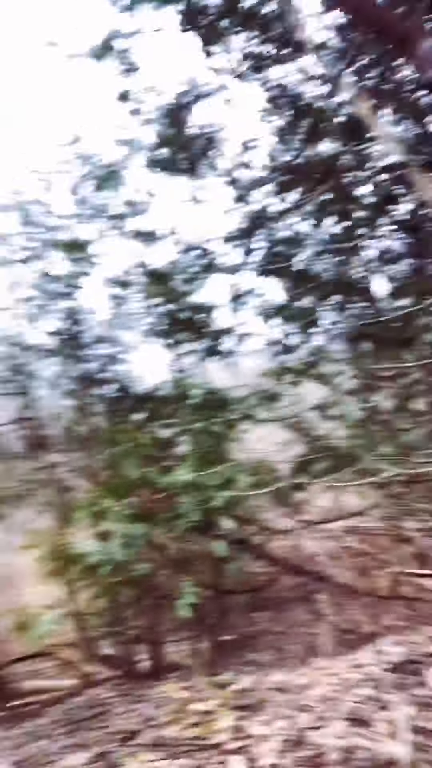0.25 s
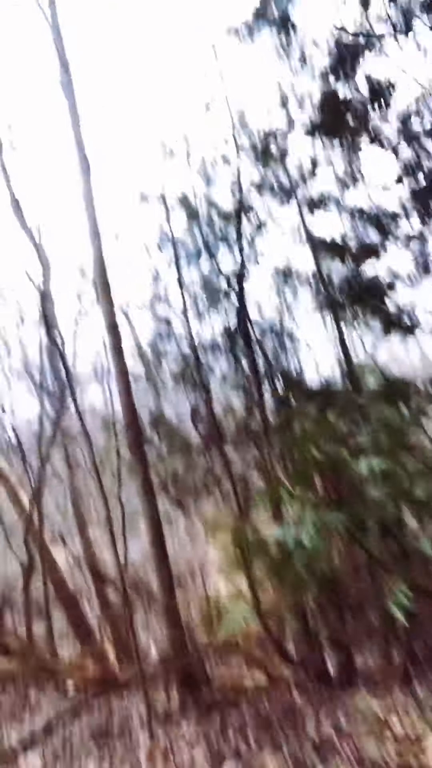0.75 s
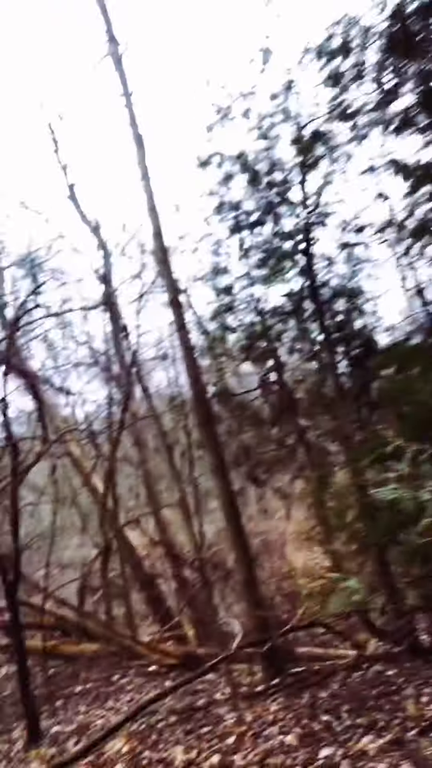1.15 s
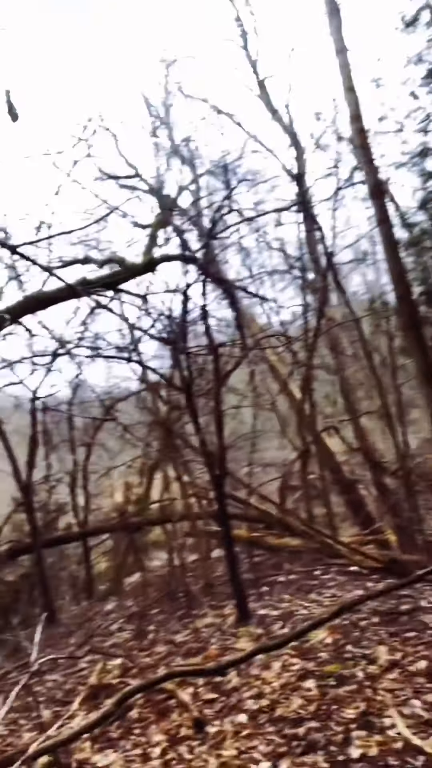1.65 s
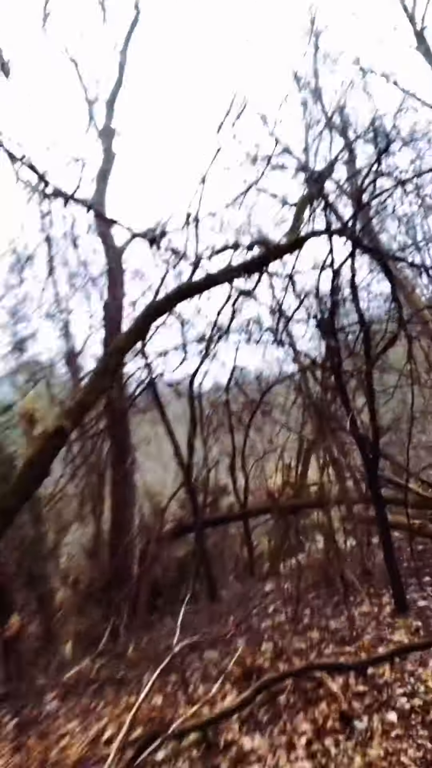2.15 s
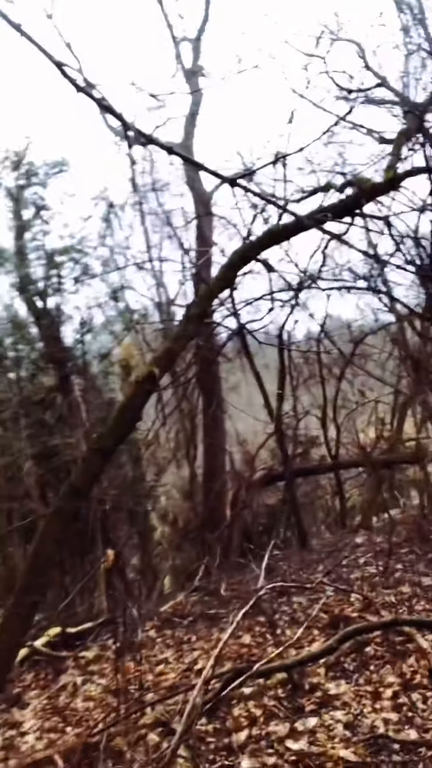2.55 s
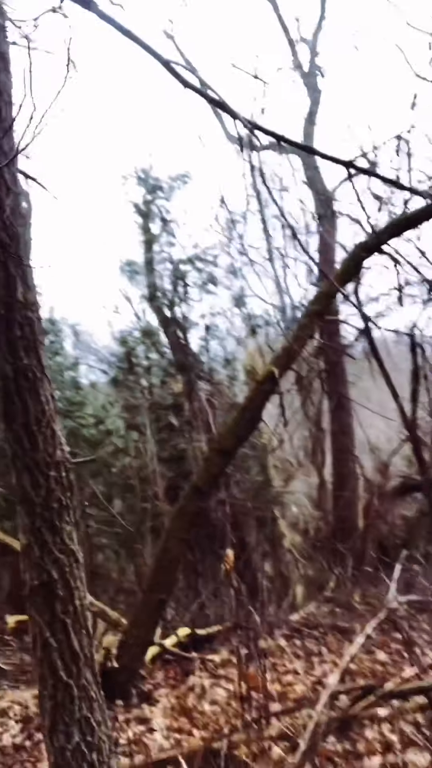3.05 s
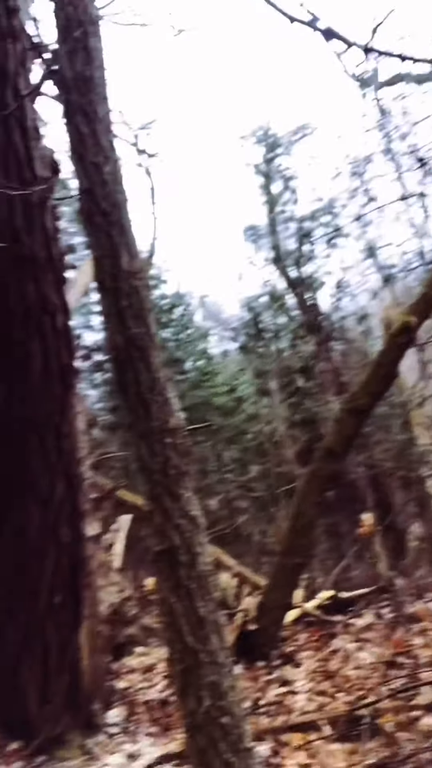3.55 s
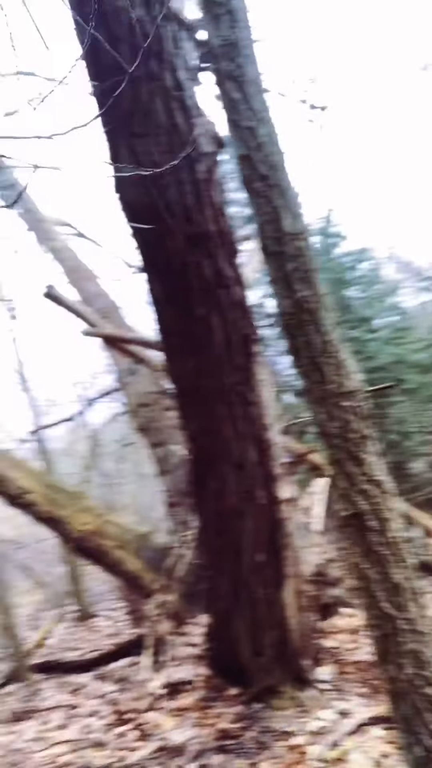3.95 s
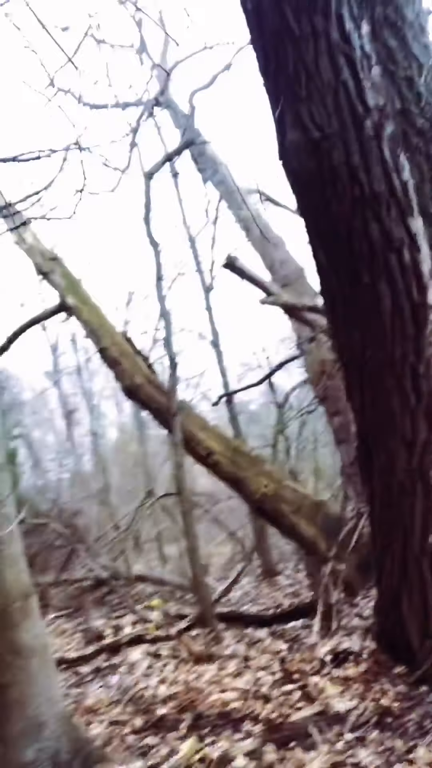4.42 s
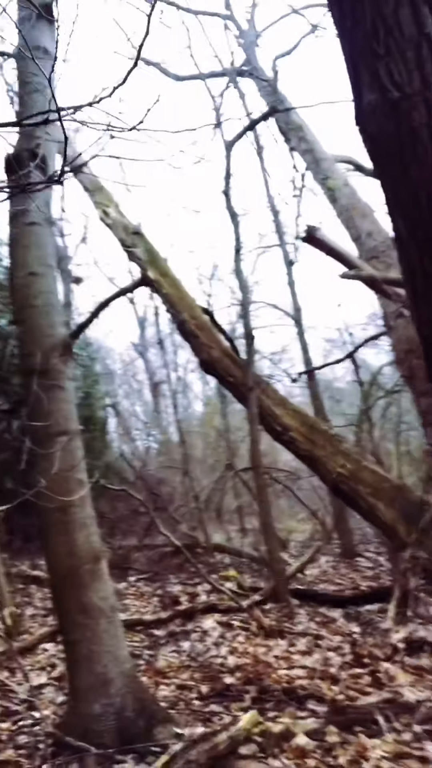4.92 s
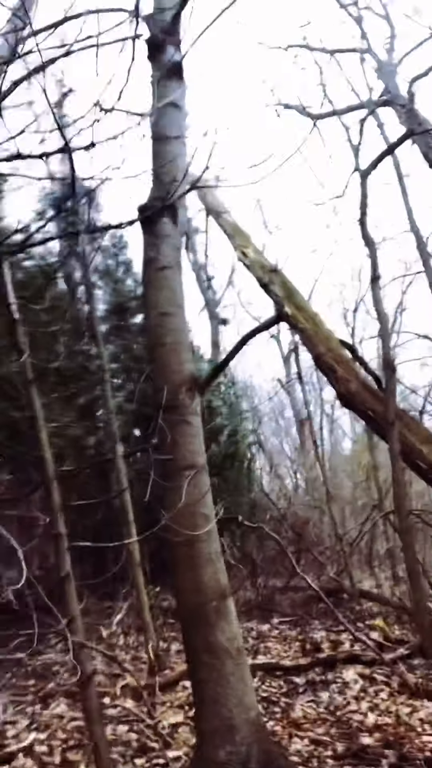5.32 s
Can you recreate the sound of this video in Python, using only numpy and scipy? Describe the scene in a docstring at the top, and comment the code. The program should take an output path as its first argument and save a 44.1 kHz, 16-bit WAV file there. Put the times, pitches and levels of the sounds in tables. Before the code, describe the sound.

A person walks slowly through dry leaf litter in a bare wood, heard close. A small snap at 0.03 s leads into a very loud, sharp double crack at about 0.14-0.16 s, hard enough to clip, with a falling woody chirp, low knock and short diffuse echo from the trunks. Leaves brush and settle in papery crackles, with a dull knock near 0.57 s. At 1.6-1.9 s come medium twig snaps, rustling and a short damp crunch. It quiets from 2 s, when faint distant songbirds whistle in short gliding phrases; soft low knocks cluster at 2.5 s. Light snaps and rustles occur around 3 s. At 3.87 s another loud, bright, splintering crack echoes, with a weaker one right after. Hoarse far calls sound from about 3.6 s onward. Small crisp twig breaks and leaf rustle come at 5.05-5.35 s. A faint, low distant roar runs throughout, slowly sinking.

```python
"""A dead stick cracks at once, sharp and close: someone walks slowly through dry leaves in a bare wood.
Each break is a snap and tearing fibres, spread along the stick into a quick falling chirp, with
bounces off the ground and a noisy tail from the trunks. Low thuds are damped tones, leaves crackle as
clumps of tiny clicks, far birds sing in gliding sine tones, and shaped noise makes a distant roar."""
import sys
import numpy as np
from scipy import signal
from scipy.fft import rfft, irfft, next_fast_len
from scipy.io import wavfile
from scipy.ndimage import uniform_filter1d

SR = 44100
rng = np.random.default_rng(int(sys.argv[2]) if len(sys.argv) > 2 else 0)


def dump_mix(stems):
    """Bounce the given channels to the path in sys.argv[1] as a 16-bit WAV at rate SR."""
    frames = np.atleast_2d(stems).T  # one column per channel
    limited = np.clip(frames, -1, 1)  # hard clip at full scale
    pcm = np.round(limited * 32767).astype(np.int16)
    wavfile.write(sys.argv[1], SR, pcm)


N = 245901   # length in samples
TIME = np.arange(N) / SR   # seconds


def from_db(db):
    """Turn decibels into a gain."""
    return 10 ** (np.asarray(db) / 20)


def unit_energy(x):
    """Scale so that the squares sum to one."""
    return x / np.sqrt(np.sum(x ** 2) + 1e-20)


def rms_one(x):
    """Scale to an average strength (rms) of one."""
    return unit_energy(x) * np.sqrt(len(x))


def add(out, start_s, sound):
    """Mix a sound in at a time in seconds."""
    start = max(round(start_s * SR), 0)
    out[start:start + len(sound)] += sound[:N - start]


def colour(x, spectrum):
    """Filter through points of (Hz, dB), as promptly as those gains allow (minimum phase)."""
    size = 2 * next_fast_len(len(x))
    point_hz, point_db = np.transpose(spectrum)
    hz = np.fft.rfftfreq(size, 1 / SR)
    gain_db = np.interp(np.log(hz + 1), np.log(point_hz), point_db)
    # folding the cepstrum forward in time keeps the filter from ringing before its input
    cepstrum = irfft(np.log(from_db(gain_db)))[:size // 2]
    cepstrum[1:] *= 2
    response = np.exp(rfft(cepstrum, size))
    return irfft(rfft(x, size) * response)[:len(x)]


def drift(rate, size=N):
    """Wander smoothly around zero by joining random points, rate of them per second."""
    steps = np.arange(size) / SR * rate
    count = int(steps[-1]) + 2
    return np.interp(steps, np.arange(count), rng.standard_normal(count))


def grains(per_s, spread_db, size=N):
    """Random clicks of random sign: many small, a few large."""
    sizes = from_db(spread_db * np.minimum(rng.exponential(1, size), 4))
    return (rng.random(size) < per_s / SR) * sizes * rng.choice([-1, 1], size)


def along_stick(x, lag_s):
    """Bending waves travel as the root of frequency, so the lows arrive last and a click chirps down."""
    size = 4 * len(x)
    hz = np.fft.rfftfreq(size, 1 / SR)
    # each pitch is late by lag_s * (sqrt(1000 / hz) - 0.2)
    cycles = lag_s * (2 * np.sqrt(1000 * hz) - hz / 5)
    return irfft(rfft(x, size) * np.exp(-2j * np.pi * cycles))[:len(x)]


# Tone colour of breaking wood. Each row: frequency in Hz, gain in dB.
WOOD_COLOUR = [(40, -38.5), (110, -21.5), (220, 0.5), (480, -2.5), (900, 2), (1800, -3.5), (3000, 0.5),
               (5000, 1.5), (7500, 0), (9000, -5), (12000, -10.5), (16000, -19.5)]


def fracture(body_db, sparkle_db, splinter_s, size=3072, lag_s=0.0022122, snap=0.39,
             shiver=0.39, shiver_s=0.0096, ground_s=.0041, ground=0.22):
    """One break: the first snap, tearing fibres, the shiver of the pieces, and a bounce off the ground."""
    t = np.arange(size) / SR
    tearing = grains(22000, 0.79, size) * np.exp(-t / splinter_s)
    tearing = unit_energy(colour(tearing, [(300, -6.5), (2500, -1)]))
    pieces = unit_energy(grains(9000, 1.8, size) * np.exp(-t / shiver_s))
    force = along_stick(snap * (t == 0) + tearing + shiver * pieces, lag_s)
    bounce = ground * np.interp(t - ground_s, t, force, left=0)
    # each break has its own low body and its own top sparkle
    body_and_sparkle = [(500, body_db), (4000, 0), (6500, 0), (13000, sparkle_db)]
    sound = colour(colour(force + bounce, WOOD_COLOUR), body_and_sparkle)
    return unit_energy(sound) * np.sqrt(.005 * SR)   # as much energy as an rms of one over 5 ms


# How the trunks scatter sound, band by band. Each row: low edge in Hz, high edge in Hz,
# level in dB, time for the nearer wood's echo to fall 60 dB in seconds.
TRUNK_BANDS = [(100, 690, -1.5, 0.17), (500, 1200, -0.5, 0.3), (1215, 2600, -1.5, 0.19),
               (2600, 5400, -0.5, .33), (5070, 7920, 3, 0.17), (8300, 12300, 0.5, 0.13),
               (12000, 16500, -3, .21)]


def wood_echo(x, far_stretch=3.4, far_db=-17, build_s=0.0019, lumps_db=0.5, size=40000):
    """Countless twigs and trunks return a diffuse tail; the deeper wood answers fainter and longer."""
    out, t = np.zeros(N), np.arange(size) / SR
    for low, high, db, t60 in TRUNK_BANDS:
        band = signal.butter(2, [low, min(high, .45 * SR)], "band", fs=SR, output="sos")
        near = from_db(-60 * t / t60)
        far = from_db(far_db - 60 * t / (far_stretch * t60))
        fade = (near + far) * (1 - np.exp(-t / build_s))
        # noise follows the smeared power of the sound in this band
        power_in = signal.sosfilt(band, x + 1e-18) ** 2
        power = signal.fftconvolve(power_in, unit_energy(fade) ** 2)[:N]
        noise = rms_one(signal.sosfilt(band, rng.standard_normal(N)))
        out += from_db(db) * np.sqrt(np.abs(power)) * noise
    return out * from_db(lumps_db * drift(600))   # single trunks stand out of the tail


# Breaking sticks and twigs, and the strongest bounces off the ground about 4 ms after a break.
# Each row: start in seconds, level in dB over 5 ms, low body in dB, top sparkle in dB,
# splintering time in seconds.
BREAKS_AND_BOUNCES = [(0.0301, -18, 6.5, 1, 0.0021), (.0340, -24, 7, 17, .002), (0.0419, -39, -2, 0, .001),
                      (0.1376, -5.5, 5, -3, 0.0014), (0.1415, -8, -15, -2, 0.00057),
                      (0.158, -9.5, -6.5, -1, 0.00126), (0.1908, -31.5, 3, -11, 0.0012),
                      (0.571, -47, 13, -19, .0007), (1.606, -36, -12, 7, 0.00069),
                      (1.6250, -22, 5.5, -6, 0.00057), (1.6294, -25, 6, -14, .0006),
                      (1.6376, -37, -6, 16, .001), (1.6441, -33.5, 12, -8, 0.0019),
                      (1.7255, -41.5, -10, -22, 0.00079), (1.7667, -46, -12, -7, 0.00095),
                      (1.8055, -44, -12, -16, .0009), (1.874, -35.5, -12.5, -7, 0.00083),
                      (1.905, -40, 0, -22, .0004), (1.9138, -30, 15, 0, 0.001), (1.9239, -38, 8, 8, .0015),
                      (2.1175, -50, -12, -23, .002), (2.937, -39, -10.5, 0, 0.00059),
                      (2.9825, -46.5, -19, 22, .001), (3.106, -36, -13, 15, 0.00063),
                      (3.1345, -43.5, -8.5, 12, .002), (3.8716, -8, -2, 11.5, 0.0045),
                      (3.8902, -18.5, 5, 14.5, 0.001135), (5.049, -34, -23.5, 8, 0.005),
                      (5.1311, -43.5, -18, -2.5, .0018), (5.192, -34, -19, 5.5, 0.0062),
                      (5.2649, -38, -17.5, 3, .0034), (5.3542, -44, -13, 5.5, .001)]
# level sent to the wood in dB, and its change per dB of body: less body, larger share
ECHO_DB, ECHO_PER_BODY_DB = -12.5, -0.2945


def sticks():
    """All the breaks and strong bounces, heard straight from their place and returned by the wood."""
    direct, outward = np.zeros(N), np.zeros(N)
    for start_s, db, body_db, sparkle_db, splinter_s in BREAKS_AND_BOUNCES:
        sound = from_db(db) * fracture(body_db, sparkle_db, splinter_s)
        add(direct, start_s, sound)
        add(outward, start_s, sound * from_db(ECHO_DB + ECHO_PER_BODY_DB * body_db))
    return direct + wood_echo(outward)


# Low thuds: dull knocks, and the low body of the loudest cracks. Each row: start in seconds,
# starting level in dB before muffling, pitch in Hz.
LOW_THUDS = [(0.1403, -10, 470), (0.1440, -20, 210), (0.5694, -24.5, 472), (.6310, -36, 197),
             (1.3850, -33, 171), (1.6310, -24, 414), (1.8600, -35.5, 258), (1.918, -31.5, 272),
             (2.5135, -32, 380), (2.5260, -30, 418), (2.538, -28, 407), (2.5507, -25, 255.6),
             (3.8750, -22, 375), (3.8790, -23, 225.2), (3.921, -35, 270), (5.0500, -37.5, 233)]
THUD_CYCLES = 11.5   # a thud falls by 60 dB within this many cycles


def thuds(press_s=0.00051, grit=0.79, muffle_hz=2500, size=6000):
    """A few cycles of a quickly damped low tone, roughened by noise around its pitch and muffled."""
    out, t = np.zeros(N), np.arange(size) / SR
    for start_s, db, hz in LOW_THUDS:
        around_pitch = [(hz / 10, -32), (hz / 3, -10), (hz, 0), (2 * hz, -4), (8 * hz, -35)]
        rough = rms_one(colour(rng.standard_normal(size), around_pitch))
        envelope = (1 - np.exp(-t / press_s)) * from_db(db - 60 * t * hz / THUD_CYCLES)
        add(out, start_s, envelope * (np.sin(2 * np.pi * hz * t) + grit * rough))
    return signal.sosfilt(signal.butter(2, muffle_hz, fs=SR, output="sos"), out + 1e-18)


def stroke(start_s, length_s, rise_db_per_s, fall_db_per_s):
    """A gain that rises until its start, holds for a length and dies away."""
    before = np.maximum(start_s - TIME, 0)
    after = np.maximum(TIME - start_s - length_s, 0)
    return from_db(-rise_db_per_s * before - fall_db_per_s * after)


# A foot brushes through the leaves. Each row: start in seconds, length in seconds,
# strength in dB before the rustle and tick trims.
FOOT_BRUSHES = [(0.078, .11, -43), (.40, .03, -49.5), (0.636, .02, -47.5), (0.728, .08, -48),
                (1.507, .04, -53), (1.662, 0.059, -45), (1.756, 0.19, -46), (2.097, 0.16, -61),
                (2.54, .02, -58), (2.948, 0.044, -49.5), (3.117, .25, -54), (3.425, .03, -47.5),
                (3.83, .04, -54.5), (4.08, 0.11, -58.5), (4.53, .05, -54.5), (5.08, .08, -48),
                (5.25, .2, -56.5)]
BRUSH_RISE_DB_PER_S, BRUSH_FALL_DB_PER_S = 190, 172.5
SETTLE_DB, SETTLE_DB_PER_S = -14, 22.5   # settling: level against its brush, and how fast it fades


def stirring():
    """How strongly the leaves move: each brush of a foot, then their slow settling."""
    power = 0
    for start_s, length_s, db in FOOT_BRUSHES:
        brush = stroke(start_s, length_s, BRUSH_RISE_DB_PER_S, BRUSH_FALL_DB_PER_S)
        settle = from_db(SETTLE_DB) * stroke(start_s, length_s, BRUSH_RISE_DB_PER_S, SETTLE_DB_PER_S)
        power = power + (from_db(db) * np.maximum(brush, settle)) ** 2
    return np.sqrt(power)


# Tone colour of the dry leaves. Each row: frequency in Hz, gain in dB.
LEAF_COLOUR = [(300, -14.5), (900, 4), (2500, -4.5), (4500, 3.5), (7500, -5), (9000, -6), (12000, -7.5),
               (16000, -12)]
TICKS_PER_S, TICK_DB = 18, -3   # tiny twigs among the leaves: how many, and their trim


def leaves(rustle_db=-4.5, clump_db=2.2, split_db=-5):
    """Dry leaves rub in clumps of tiny grains and now and then split, while tiny twigs tick."""
    rubbing = rms_one(grains(12000, 2.9) * from_db(clump_db * drift(90)))
    tear = np.exp(-np.arange(80) / 20) * rng.standard_normal(80)
    splitting = rms_one(signal.fftconvolve(grains(130, 2.5), tear)[:N])
    crackle = rms_one(colour(rubbing + from_db(split_db) * splitting, LEAF_COLOUR))
    twig = fracture(body_db=-7, sparkle_db=-14, splinter_s=.001)
    ticks = signal.fftconvolve(grains(TICKS_PER_S, 0.85), twig)[:N]
    return stirring() * (from_db(rustle_db) * crackle + from_db(TICK_DB) * ticks)


# Tone colour of the duller, damp litter below. Each row: frequency in Hz, gain in dB.
LITTER_COLOUR = [(100, -6), (250, 5.5), (600, -2.5), (1500, -5.5), (4500, -8), (9000, -18), (16000, -26)]
CRUSH_AT_S, CRUSH_LENGTH_S, CRUSH_DB = 1.868, 0.065, -39
CRUSH_RISE_DB_PER_S, CRUSH_FALL_DB_PER_S = 250, 400


def crushed_litter():
    """The sole crushes a pad of damp litter once: a short burst of dull grains."""
    crunch = rms_one(colour(grains(3500, 3.3), LITTER_COLOUR))
    tread = stroke(CRUSH_AT_S, CRUSH_LENGTH_S, CRUSH_RISE_DB_PER_S, CRUSH_FALL_DB_PER_S)
    return from_db(CRUSH_DB) * tread * crunch


# Phrases of far songbirds. Each row: start in seconds, length of one note in seconds, level at the
# start in dB before the blur of the trees, swell to the end in dB, list of note pitches in Hz.
SONG_PHRASES = [(2.015, 0.024, -50, 4.5, [3040, 3060]), (2.09, .035, -49, -3, [2570, 2690]),
                (2.125, 0.038, -56, 0, [3580, 3600]), (2.305, 0.0459, -52.5, 7.5, [2320, 2300, 2215, 2510]),
                (2.40, 0.121, -64.5, -2, [5560, 5570, 5540]),
                (2.728, 0.039, -50.5, 3, [2995, 2869, 2950, 3500]), (2.82, 0.023, -49, 0.5, [2500, 2570]),
                (3.04, .046, -53, 8, [2294, 2330, 2230, 2520]),
                (3.422, 0.018, -46.5, 0, [3646, 3470, 3200, 2710, 2640]),
                (3.56, .035, -48, -0.5, [2710, 2760, 2620, 2680]), (3.61, 0.0192, -46.5, -3, [3130, 3040]),
                (4.015, 0.038, -48, -2.5, [2575, 2436, 2410, 2360, 2250]),
                (4.02, .025, -48, -3, [2830, 2980, 2850]), (4.95, 0.025, -54, 0, [3240, 3230]),
                (5.34, 0.0254, -45, 0, [2900, 3020]), (5.475, .03, -46.5, 1, [2350, 2240])]
# A larger bird calls hoarsely from farther off. Each row: start in seconds, length of one note in
# seconds, level at the start in dB before the blur, swell to the end in dB, list of note pitches in Hz.
HOARSE_CALLS = [(3.55, 0.0336, -49, 2.5, [1560, 1450]), (4.02, 0.02937, -45.5, -1.5, [1400, 1260]),
                (4.77, 0.0603, -45.5, -1, [1310, 1400]), (5.22, 0.0492, -46.5, 0.5, [1340, 1295])]
SLUR_SHARE = 0.58   # part of a note spent gliding to its neighbours


def birds(phrases, waver_hz, waver_rate, flutter_db, t60, wet_db, size=30000):
    """Phrases of slurred, fluttering whistles, smeared by many paths between the trees."""
    out = np.zeros(N)
    for start_s, note_s, db, swell_db, pitches in phrases:
        note = int(note_s * SR)
        steps_hz = np.repeat(np.array(pitches, float), note)
        hz = uniform_filter1d(steps_hz, max(int(SLUR_SHARE * note), 1))
        hz = hz + waver_hz * drift(waver_rate, len(hz))
        along = np.linspace(0, 1, len(hz))
        envelope = from_db(db + swell_db * along) * np.abs(np.sin(np.pi * along)) ** 0.21
        add(out, start_s, envelope * np.sin(2 * np.pi * np.cumsum(hz) / SR))
    fade = from_db(-60 * np.arange(size) / SR / t60)
    paths = unit_energy(grains(900, 4.5, size) * fade)
    blurred = from_db(wet_db) * signal.fftconvolve(out, paths)[:N]
    return (1.04 * out + blurred) * from_db(flutter_db * drift(110))


# Tone colour of the distant roar. Each row: frequency in Hz, gain in dB.
ROAR_COLOUR = [(22, -42), (36, -12.5), (55, -2.5), (110, 1), (200, -6), (330, -6), (500, -3), (950, -4),
               (1400, -8.5), (2100, -12.5), (4200, -19.5), (7500, -29.5), (9500, -35.5), (16000, -43)]
AIR_DB, AIR_FADE_DB_PER_S = -42, .5   # the roar sinks slowly as the walker goes on


def air():
    """The even roar of far wind and roads: random noise, strongest in the lows."""
    roar = rms_one(colour(rng.standard_normal(N), ROAR_COLOUR))
    return from_db(AIR_DB - AIR_FADE_DB_PER_S * TIME) * roar


def scene():
    """The walker close by, the birds and the air far behind."""
    song = birds(SONG_PHRASES, waver_hz=54.8, waver_rate=330, flutter_db=2.5, t60=0.95, wet_db=1.0)
    caws = birds(HOARSE_CALLS, waver_hz=79.6, waver_rate=630, flutter_db=1.5, t60=1.0, wet_db=1.0)
    return (sticks() + thuds() + leaves() + crushed_litter() + song + caws + air())[None]


CUTOFF_HZ = 16000


def record(dry, top=0.84):
    """Peaks too loud for the microphone are clipped flat; then the highest treble is cut."""
    clipped = np.clip(dry, -top, top)
    return signal.sosfilt(signal.ellip(10, .1, 70, CUTOFF_HZ, fs=SR, output="sos"), clipped)


dry = scene()
out = record(dry)
dump_mix(out)
```